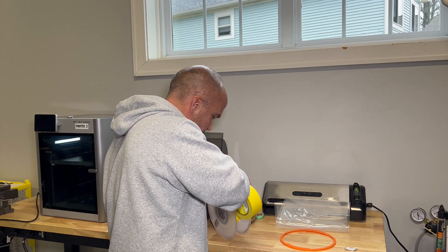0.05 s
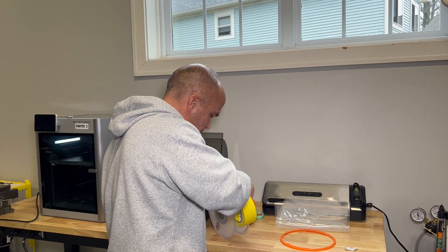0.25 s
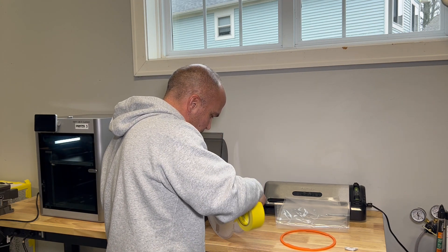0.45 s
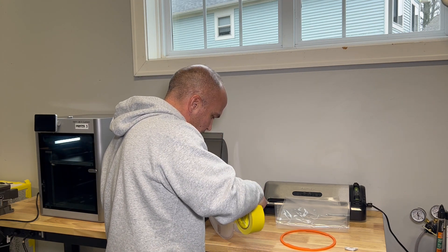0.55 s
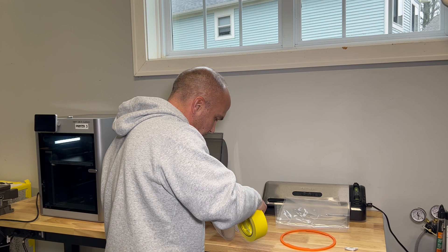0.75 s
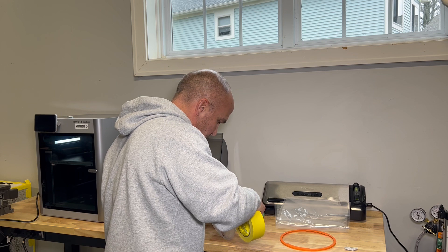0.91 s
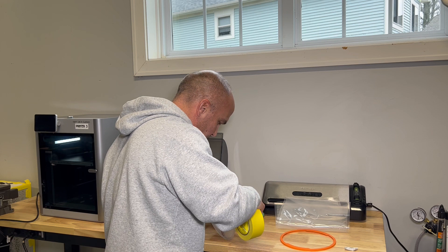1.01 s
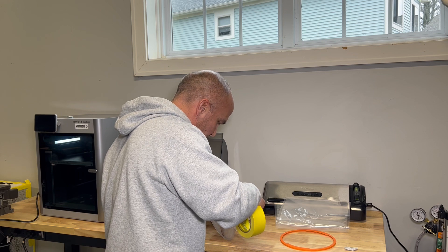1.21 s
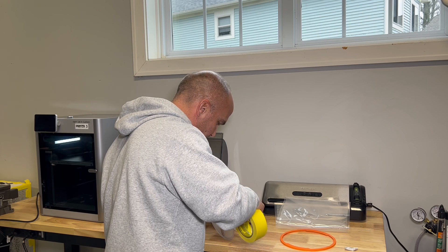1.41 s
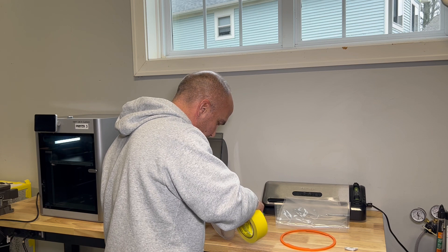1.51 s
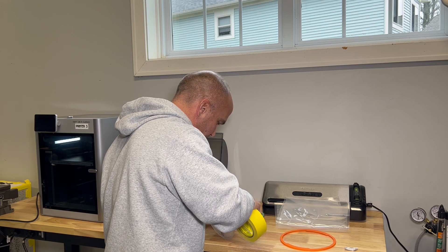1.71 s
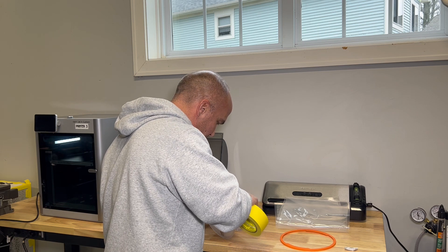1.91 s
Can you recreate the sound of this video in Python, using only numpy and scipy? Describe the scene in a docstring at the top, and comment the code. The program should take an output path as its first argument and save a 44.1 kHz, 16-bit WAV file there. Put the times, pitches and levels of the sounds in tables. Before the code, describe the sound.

Adhesive tape peels off its roll: a dense, bright, jerky crackle from about 0.2 to 0.5 seconds, stopping abruptly and ringing into a bare workshop. Single crisp snaps follow near 0.7, 0.9, 1.0 and 1.1 seconds, with soft, dull rustles around 0.9, 1.25 and 1.55. A rapid cluster of tiny ticks comes at 1.65. Faint rumble and hiss lie underneath, with the phone two metres away.

```python
"""Tape pulled off a roll

Adhesive tape peels at a workbench in a bare, live workshop, two metres from a phone.
The long pull is a dense crackle of random slips; single snaps are noise bursts that ring strip, roll and bench.
Soft handling rustles are grainy noise. The wall behind the bench doubles the snaps and the room rings on,
as early echoes and a decaying noise tail. A low rumble and faint hiss, both filtered noise, lie underneath."""
import sys
import numpy as np
from scipy import signal
from scipy.fft import rfft, irfft, next_fast_len
from scipy.io import wavfile
from scipy.ndimage import uniform_filter1d

SR = 44100
rng = np.random.default_rng(int(sys.argv[2]) if len(sys.argv) > 2 else 0)


def log_audio(samples):
    """Write samples as a 16-bit WAV file to the path given in sys.argv[1]."""
    # one column per channel
    frames = np.atleast_2d(samples).T
    # limit to full scale, then quantise
    limited = np.clip(frames, -1, 1)
    pcm = np.round(limited * 32767).astype(np.int16)
    wavfile.write(sys.argv[1], SR, pcm)


N = 85995
TIME_S = np.arange(N) / SR
FFT_SIZE = next_fast_len(N + SR, real=True)
FREQ_HZ = np.arange(FFT_SIZE // 2 + 1) * SR / FFT_SIZE + 1e-3  # offset avoids log(0)
LEFT_RIGHT = np.array([[1], [-1]])


def undb(db):
    """Amplitude factor of a level in dB."""
    return 10 ** (np.asarray(db) / 20)


def unit(x):
    """Scales to an RMS of one."""
    return x / np.sqrt(np.mean(x ** 2))


def over_hz(table):
    """Second column of a table, interpolated over log frequency."""
    a = np.array(table)
    return np.interp(np.log(FREQ_HZ), np.log(a[:, 0]), a[:, 1])


def shape(x, gain):
    """Filters by multiplying the spectrum."""
    return irfft(rfft(x, FFT_SIZE) * gain, FFT_SIZE)[..., :N]


def causal(gain):
    """Minimum-phase response with this gain, by folding the cepstrum."""
    cepstrum = irfft(np.log(gain + 1e-5), FFT_SIZE)
    cepstrum[1:FFT_SIZE // 2] *= 2
    cepstrum[FFT_SIZE // 2 + 1:] = 0
    return np.exp(rfft(cepstrum))


def bands(edges_hz):
    """Gains that split the spectrum at the edges and sum to one."""
    lows = [1 / (1 + (FREQ_HZ / edge) ** 6) for edge in edges_hz]
    lows.append(np.ones_like(FREQ_HZ))
    return [lows[0]] + [upper - lower for lower, upper in zip(lows, lows[1:])]


def in_bands(x, edges_hz):
    """The bands of each row, each scaled to unit energy."""
    responses = irfft([causal(g) for g in bands(edges_hz)], FFT_SIZE)[:, :1024]
    y = signal.fftconvolve(x[:, None], responses[None], axes=2)
    return y / np.sqrt(np.sum(y ** 2, axis=2, keepdims=True))


def walk(rate_hz):
    """Random levels held 1 / rate_hz and slewed; RMS of one."""
    hold = int(SR / rate_hz)
    steps = np.repeat(rng.standard_normal(N // hold + 1), hold)
    return unit(uniform_filter1d(steps, hold)[:N])


def burst(count, rise_s, fall_s):
    """Rows of short noise bursts, evened out in spectrum, of unit energy."""
    t = np.arange(256) / SR
    env = (1 - np.exp(-t / rise_s)) * np.exp(-t / fall_s)
    spectrum = rfft(rng.standard_normal((count, len(t))) * env)
    b = irfft(spectrum / np.abs(spectrum)) * np.sqrt(env)
    return b / np.sqrt(np.sum(b ** 2, axis=1, keepdims=True))


# peel before strip and room: t/s, 2-3.3 kHz level/dB,
# then relative levels/dB: below 950 Hz, 950-2000 Hz, 3.3-10 kHz, above 10 kHz
PULL_BANDS = [(0, -78.5, 3, 10, 14.5, 9), (.052, -72, -16, 3, -5.5, -7), (.138, -74, 3.5, 2, 4.5, 8),
              (.18, -52, -14.5, -3, -6, -4.5), (.196, -41.5, -3.5, -5.5, -3.5, -2),
              (.212, -53.5, -0.5, -6, -2, -2.5), (.234, -39.5, -12, -1.5, 2.5, 8),
              (.255, -36.5, -2.5, -5.5, -6.5, -3), (.288, -49, -13.5, 3.5, -7.5, -8),
              (.3, -57.5, -3, -3, -1, 0), (.313, -45.5, -13.5, 5, -7, -5.5),
              (.324, -39, -11.5, -1.5, -6.5, 0), (.404, -37.5, 0, 2, -3.5, 2),
              (.496, -45, -11, -6.5, 6, 12), (.53, -56, -0.5, 2, -4, 2.5)]
# big slips within the pull: t/s, level over the smallest slip/dB
BIG_SLIPS = [(0.2661, 27.5), (0.2863, 9), (0.3149, 26), (0.3264, 26), (0.346, 18), (0.3559, 19), (.375, 17),
             (.386, 21), (0.403, 19.5), (0.418, 18), (0.4368, 15.5)]
PULL_SPLITS_HZ = (950, 2000, 3300, 10000)
PULL_FADE_S, SLIPS_PER_S, SLIP_SCATTER_DB, SLIP_S, PATCHY_DB = .012, 2200, 3.5, 0.00059, 1.7


def pull():
    """Stick and slip: dense uneven clicks, in patches, with big jerks; five bands follow the pull."""
    a = np.array(PULL_BANDS)
    hit, size, sign = rng.random(N), rng.exponential(size=N), rng.standard_normal(N)
    click_db = np.minimum(size, 2) * SLIP_SCATTER_DB + PATCHY_DB * walk(119.9)
    clicks = (hit < SLIPS_PER_S / SR) * undb(click_db)
    grains = signal.lfilter([1], [1, -np.exp(-1 / (SLIP_S * SR))], clicks) * sign

    jerk_bursts = burst(len(BIG_SLIPS), SLIP_S / 4, 2 * SLIP_S)
    for (s, db), b in zip(BIG_SLIPS, jerk_bursts):
        grains[int(s * SR):][:len(b)] += undb(db) * np.sqrt(SLIP_S * SR / 2) * b

    db, bass, low, high, top = (np.interp(TIME_S, a[:, 0], a[:, k]) for k in range(1, 6))
    band_db = db + np.array([bass, low, 0 * TIME_S, high, top])
    parts = in_bands(grains[None], PULL_SPLITS_HZ)[0, :, :N] * np.sqrt(N)
    gate = np.clip((a[-1, 0] - TIME_S) / PULL_FADE_S, 0, 1)
    return strip(gate * np.sum(parts * undb(band_db), axis=0))


# taut strip: t/s, f/Hz
STRIP_PITCH = [(.25, 2470), (.35, 2500), (.41, 2050), (.435, 2570), (.47, 2000)]
STRIP_WIDTH_HZ, STRIP_DB = 565, 5


def strip(x):
    """Adds the taut strip's one broad resonance, its centre gliding."""
    turn = np.exp(2j * np.pi * np.cumsum(np.interp(TIME_S, *np.array(STRIP_PITCH).T)) / SR)
    pole = np.exp(-np.pi * STRIP_WIDTH_HZ / SR)
    # shift the centre to 0 Hz, low-pass, shift back
    resonance = turn * signal.lfilter([1 - pole], [1, -pole], x / turn)
    return x + 2 * undb(STRIP_DB) * np.real(resonance)


# snaps and ticks before ringing and room: t/s, 950-3000 Hz level over 10 ms/dB,
# then relative levels/dB: below 950 Hz, 3-4.5 kHz, 4.5-10 kHz, above 10 kHz; strip f/Hz
SNAPS = [(0.021, -64.5, -17, -8, -13, -2, 1630), (.046, -64, -31, 5, 4, 4.5, 1640),
         (0.185, -50.5, -8, -10, -9, -0.5, 1140), (0.6745, -48, -4, 9, 14.5, 16, 1730),
         (0.928, -52, -4.5, 8, 12.5, 9.5, 1666), (1.0185, -48, -5, 1.5, 4.5, 7, 1670),
         (1.0815, -52.5, -4, 6, 2.5, 5, 1110), (1.313, -83.5, 10.5, -7, -11, 8, 1510),
         (1.633, -65.5, -26, 5, 7, -16.5, 2030), (1.6417, -51, 7, 13, 11.5, 10, 1670),
         (1.651, -61.5, 2.5, -9, 2, -1.5, 1830), (1.660, -55, 3.5, 12.5, 14, 2, 1720),
         (1.671, -60.5, 10, 3, 13, 7, 1710)]
# bench and roll modes: f/Hz, level/dB, t60/s
BENCH_RINGS = [(291, 3.5, 0.087), (421, -6.5, .08), (603.6, 5, 0.057), (2376, -6, 0.04), (3690, -6, 0.0078),
               (4936, -1, 0.011)]
SNAP_SPLITS_HZ = (950, 3000, 4500, 10000)
SNAP_RISE_S, SNAP_FALL_S = 0.0002, 0.0014
SNAP_RING_DB, SNAP_RING_T60_S = 10.5, 0.014
THUMP_CYCLES, THUMP_TOP_HZ = 6.53, 747


def snaps():
    """Millisecond bursts weighted by band; strip, roll and bench ring, the thump falls in pitch."""
    out = 0
    split_bursts = in_bands(burst(len(SNAPS), SNAP_RISE_S, SNAP_FALL_S), SNAP_SPLITS_HZ)
    for (s, db, bass, *treble, hz), b in zip(SNAPS, split_bursts):
        gains = undb(db + np.array([bass, 0, *treble]))
        one = rfft(np.sqrt(SR / 100) * gains @ b, FFT_SIZE)
        strip_ring = 1 + ring(hz, SNAP_RING_DB, SNAP_RING_T60_S)
        out = out + one * strip_ring * np.exp(-2j * np.pi * FREQ_HZ * s)
    # all-pass: below THUMP_TOP_HZ, lower comes later
    x = np.clip(FREQ_HZ / THUMP_TOP_HZ, .1, 1)
    late = np.exp(-2j * np.pi * THUMP_CYCLES * (np.log(x) - x + 1))
    bench = 1 + sum(ring(*mode) for mode in BENCH_RINGS)
    return irfft(out * late * bench, FFT_SIZE)[:N]


def ring(hz, db, t60_s):
    """Response of one exponentially decaying mode."""
    return undb(db) / (1 + 2j * (FREQ_HZ - hz) * np.pi * t60_s / np.log(1000))


# handling rustles and bumps before the room: t/s, decay/s, level/dB, centre f/Hz
RUSTLES = [(0.935, 0.04, -54, 316), (1.236, 0.037, -62.5, 497), (1.37, 0.01, -71, 1580),
           (1.5538, 0.073, -69, 1960), (1.555, 0.026, -68, 400)]


def rustles():
    """Grainy noise in one broad band, opened by a 2 ms tap, decaying, cut after two decay times."""
    out = 0
    for s, decay_s, db, hz in RUSTLES:
        band = 1 / (1 + ((FREQ_HZ - hz ** 2 / FREQ_HZ) / hz) ** 4)
        grain = unit(shape(rng.standard_normal(N) * undb(2 * walk(440)), band))
        env = np.exp(-np.abs(TIME_S - s) / decay_s) + 2 * (TIME_S < s + .002)
        gate = (TIME_S > s) * (TIME_S < s + 2 * decay_s)
        out = out + grain * undb(db) * env * gate
    return out


# first echoes: delay/s, levels/dB: below 3.3 kHz, 3.3-10 kHz, above 10 kHz; left over right/dB
ECHOES = [(.0036, -6.5, 5.5, -0.5, 3), (.0075, -19.5, -13, -6, -10), (0.01, -7, -7, -11.5, -4)]
# tail bands: f/Hz, t60/s, level/dB, likeness of left and right (0-1)
ROOM_TAIL = [(149, 0.74, 1.5, 0), (397, 0.73, 1, 0), (1000, 0.7, 4.5, 0), (2220, 0.65, -1, 0),
             (3670, 0.75, 6.5, 0), (5700, 0.71, 14.5, 0.2), (7520, 0.15, 3.5, 0.2), (9000, 0.32, 2, .7),
             (12600, 0.3, 2.5, 0.3), (16430, 0.44, -10, .7)]
ECHO_SPLITS_HZ, ECHO_SMEAR_S = (3300, 10000), 0.00059
DIRECT_PAN_DB, TAIL_PAN_DB = -1, 1.5  # left over right
TAIL_START_S = 0.0082  # fades in from 0.5 to 1.5 times this


def room():
    """Left and right spectrum: direct sound, smeared first echoes, noise tail decaying by band."""
    out = undb(DIRECT_PAN_DB * LEFT_RIGHT / 2) + 0j * FREQ_HZ
    split = bands(ECHO_SPLITS_HZ)
    smear = burst(2 * len(ECHOES), ECHO_SMEAR_S / 4, ECHO_SMEAR_S).reshape(len(ECHOES), 2, -1)
    for (s, low, mid, top, pan), b in zip(ECHOES, smear):
        both = rfft(b[0] + .5 * LEFT_RIGHT * b[1], FFT_SIZE) * np.exp(-2j * np.pi * FREQ_HZ * s)
        colour = sum(g * undb(db) for g, db in zip(split, (low, mid, top)))
        out = out + both * undb(pan * LEFT_RIGHT / 2) * colour

    a, t, tail = np.array(ROOM_TAIL), TIME_S[:SR], 0
    noise = rfft(rng.standard_normal((2, SR)), FFT_SIZE)
    tail_bands = bands(np.sqrt(a[1:, 0] * a[:-1, 0]))
    for (_, t60_s, db, like), g in zip(ROOM_TAIL, tail_bands):
        like = np.clip(like, -.99, .99)
        mid, side = irfft(noise * g, FFT_SIZE)[:, :SR] * np.sqrt([[1 + like], [1 - like]])
        decay = undb(db - 60 * t / t60_s) / np.sqrt(SR * t60_s / np.log(1000))
        tail = tail + (mid + LEFT_RIGHT * side) * decay
    fade_in = np.clip(t / TAIL_START_S - .5, 0, 1)
    return out + rfft(tail * undb(TAIL_PAN_DB * LEFT_RIGHT / 2) * fade_in, FFT_SIZE)


# rumble: t/s, deep level/dB, upper level/dB
RUMBLE = [(0.0, -65, -60), (0.124, -57.5, -48.5), (0.218, -59, -64), (0.396, -54, -50), (0.9, -67.5, -82),
          (1.112, -61, -62), (1.21, -64, -89), (1.428, -75.5, -82), (1.618, -65.5, -93),
          (1.802, -69, -74.5), (1.95, -83, -73)]
# deep and upper rumble: centre f/Hz, width/Hz
RUMBLE_BANDS = [(80, 50), (190, 148)]
RUMBLE_SIDE_DB = -15.5


def rumble():
    """Two bands of low noise, wavering in level, nearly alike in both ears."""
    a, out = np.array(RUMBLE), 0
    for k, (hz, width_hz) in enumerate(RUMBLE_BANDS):
        band = 1 / (1 + ((FREQ_HZ - hz ** 2 / FREQ_HZ) / width_hz) ** 2)
        mid, side = shape(rng.standard_normal((2, N)), band)
        both = (mid + undb(RUMBLE_SIDE_DB) * LEFT_RIGHT * side) / np.std(mid)
        out = out + both * undb(np.interp(TIME_S, a[:, 0], a[:, k + 1]))
    return out


# hiss spectrum: f/Hz, relative level/dB
HISS_COLOUR = [(200, -1), (1000, -6.5), (2500, -10.5), (5300, -20.5), (8000, -30.5), (13000, -21),
               (16000, -23.5)]
HISS_DB = -75


def hiss():
    """Steady coloured noise above 150 Hz, independent in each ear."""
    gain = undb(over_hz(HISS_COLOUR)) * (FREQ_HZ > 150)
    return unit(shape(rng.standard_normal((2, N)), gain)) * undb(HISS_DB)


# colour of all tape sounds: f/Hz, level/dB
TAPE_COLOUR = [(70, -20), (250, -3), (900, -4.5), (2600, -2), (3700, -3), (6000, 0.5), (8500, 0),
               (12500, 6.5), (15300, -3.5), (16200, -26.5)]
SNAP_PAN_DB = 0.5


def scene():
    """Tape sounds through the room; snaps and rustles sit slightly left of the pull."""
    path = causal(undb(over_hz(TAPE_COLOUR))) * room()
    moved = undb(SNAP_PAN_DB * LEFT_RIGHT / 2)
    tape = shape(pull(), path) + moved * shape(snaps() + rustles(), path)
    return tape + rumble() + hiss()


# two ports: f/Hz, phase by which left leads/rad
PORT_PHASE = [(1800, -0.5), (4500, 0.27), (6800, -0.5), (9000, -1), (10200, -2), (11500, -2.5), (13000, -5),
              (16200, -9)]
# colour of the half sum: f/Hz, level/dB
MID_COLOUR = [(7500, -0.5), (9000, -3.5), (9700, -15.5), (10200, -32), (10800, -10.5), (11600, 2)]
# colour of the half difference: f/Hz, level/dB
SIDE_COLOUR = [(1000, -3.5), (5000, 1), (9000, -1.5), (10200, -3.5), (15000, -4.5)]
TOP_HZ = 16300


def record(dry):
    """Ports drift apart in treble phase; their sum is notched near 10 kHz; the top is cut."""
    left, right = shape(dry, np.exp(.5j * over_hz(PORT_PHASE) * LEFT_RIGHT))
    mid = shape((left + right) / 2, causal(undb(over_hz(MID_COLOUR))))
    side = shape((left - right) / 2, causal(undb(over_hz(SIDE_COLOUR))))
    low_pass = signal.ellip(10, .2, 90, TOP_HZ, fs=SR, output="sos")
    return signal.sosfilt(low_pass, [mid + side, mid - side])


dry = scene()
out = record(dry)
log_audio(out)
```